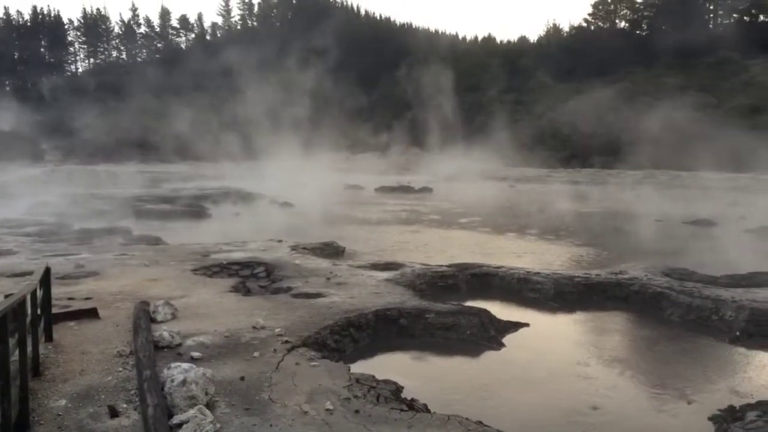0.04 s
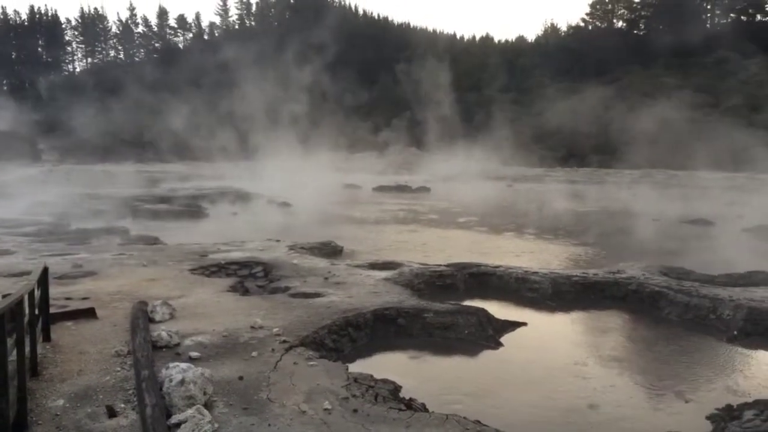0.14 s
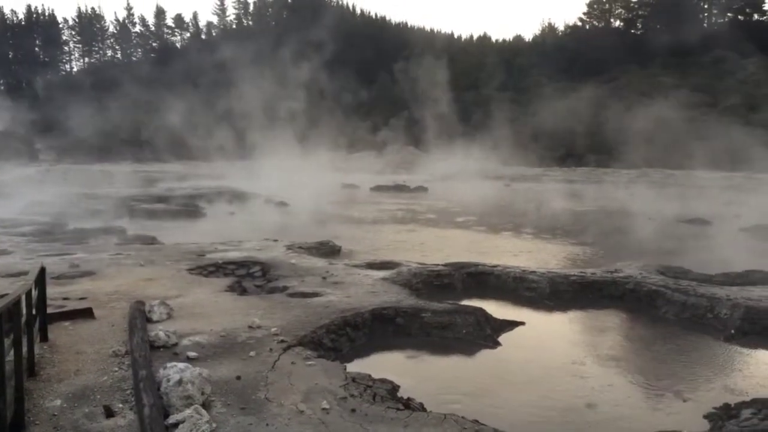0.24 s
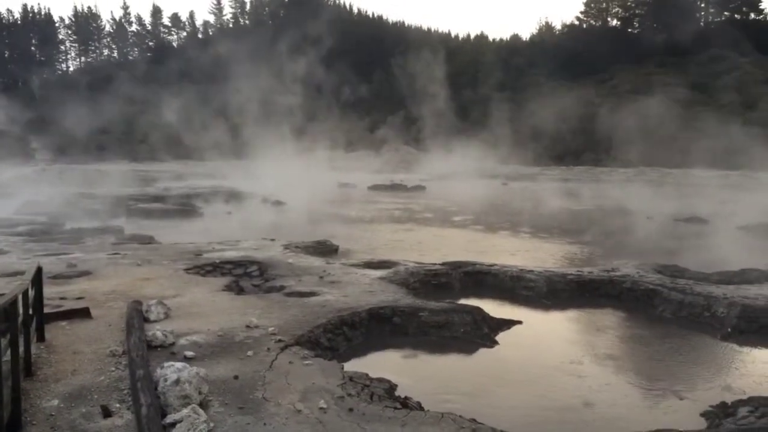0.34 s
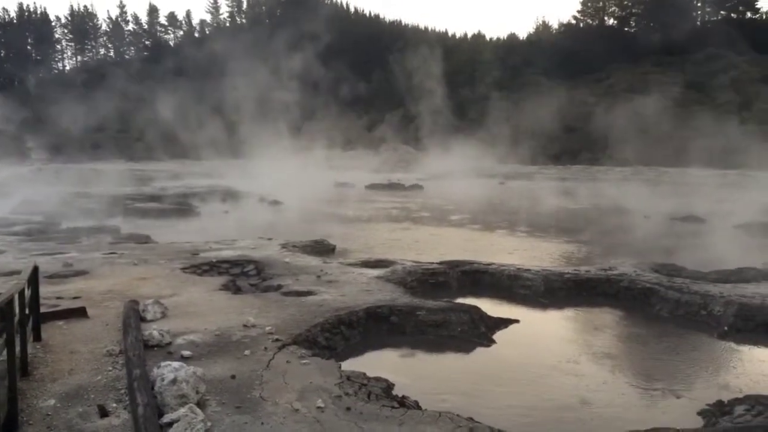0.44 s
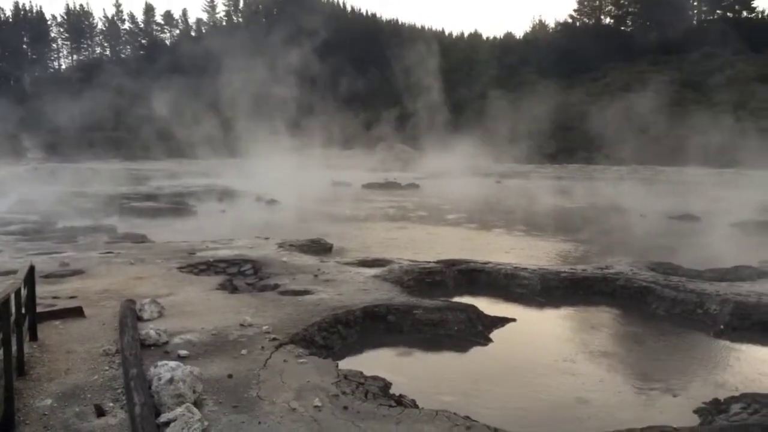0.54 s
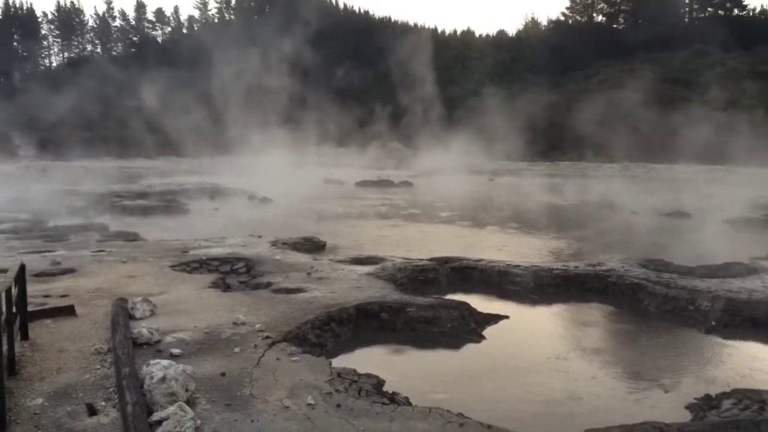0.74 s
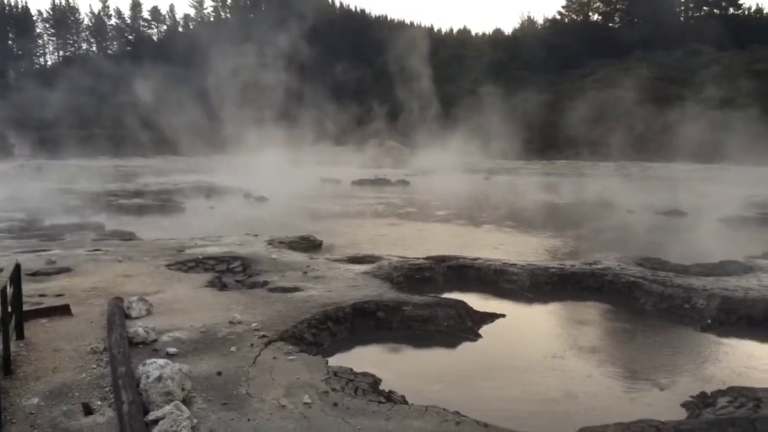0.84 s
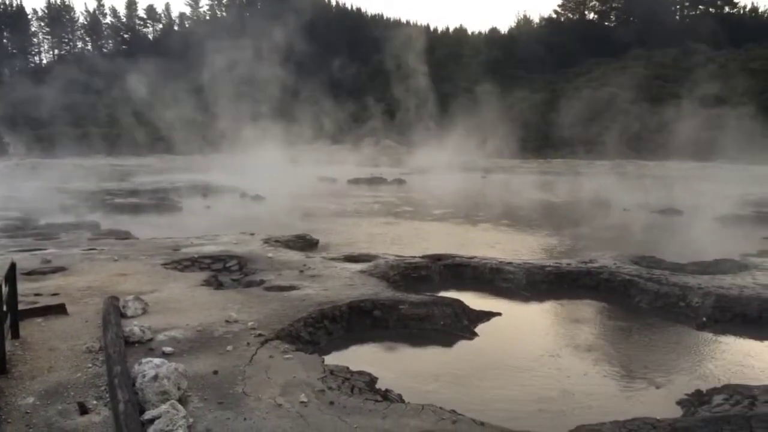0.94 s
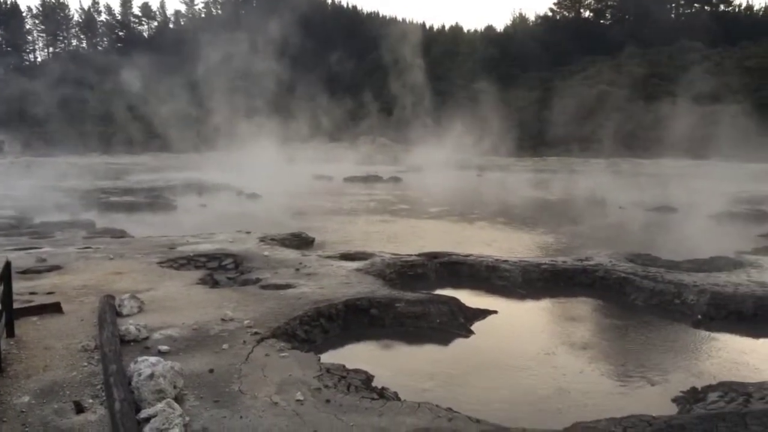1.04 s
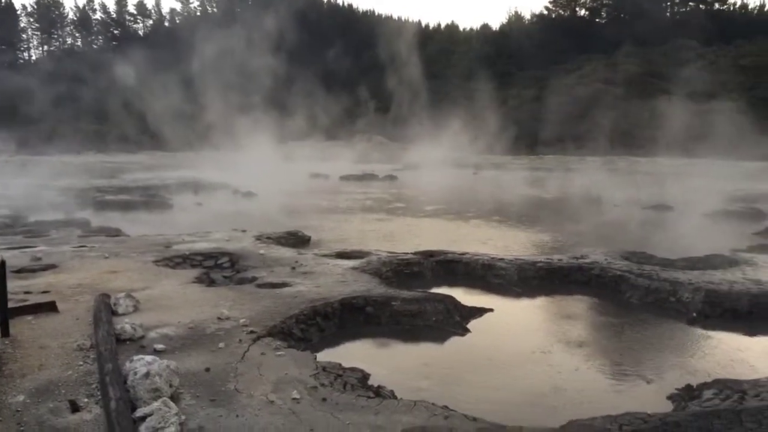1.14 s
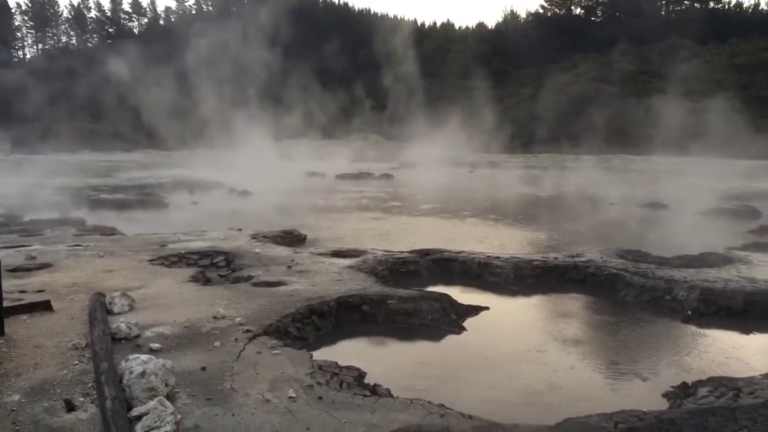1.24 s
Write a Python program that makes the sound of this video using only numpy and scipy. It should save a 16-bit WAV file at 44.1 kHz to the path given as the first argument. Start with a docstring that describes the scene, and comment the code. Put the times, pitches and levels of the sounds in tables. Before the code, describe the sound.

Thick mud bubbling with low plops over a faint, steady hiss of steam.

```python
"""Big gas bubbles heave through the thick mud of a hot outdoor pool, making low plops.
Each pocket of gas rings for just a few cycles before the mud stops it. Smaller bubbles
burst with a short rising blip, and flung droplets land with tiny ticks. Far bubbles and
wind murmur underneath, and steam hisses steadily over it all."""
import sys
import numpy as np
from scipy import signal
from scipy.fft import rfft, irfft
from scipy.io import wavfile
from scipy.ndimage import uniform_filter1d

SR = 44100
rng = np.random.default_rng(int(sys.argv[2]) if len(sys.argv) > 2 else 0)


def to_wav(s):
    """Save 16-bit WAV."""
    ch = np.atleast_2d(s).T  # columns
    pcm = np.round(np.clip(ch, -1, 1) * 32767)  # PCM
    wavfile.write(sys.argv[1], SR, pcm.astype(np.int16))


N = 57330  # samples: 1.3 seconds

# Tone of the steady background hiss, dropping sharply above about 2.5 kHz:
# (frequency [Hz], relative level [dB])
HISS_SPECTRUM = [(290, -10), (500, -3.5), (700, -1.5), (1000, 0), (1300, -4), (1550, -6.5), (1900, -6.5),
                 (2350, -2), (2530, -4.5), (2640, -18), (3000, -12), (3450, -15.5), (3850, -12.5),
                 (4700, -20), (6400, -18), (7300, -25.5), (8600, -29.5), (15000, -32.5)]
# Tone of the murmur, mostly bass: (frequency [Hz], relative level [dB])
MURMUR_SPECTRUM = [(20, -17), (40, -9), (65, 2.5), (100, -4), (150, -8.5), (220, -13.5), (350, -19.5),
                   (500, -26), (800, -53.5)]
# How loud the murmur is as time passes: (time [s], level [dB])
MURMUR_LEVELS = [(0, -49.5), (0.301, -50.5), (.55, -49.5), (.75, -54), (1.0, -52.5), (1.15, -57),
                 (1.3, -55.5)]
# Big bubbles: (start [s], pitch [Hz], level [dB], fade [cycles])
BIG_BUBBLES = [(0.0783, 71.5, -34.5, 0.43), (0.1352, 129, -45, 5.3), (0.1504, 71, -40.5, 3.5),
               (0.215, 84.8, -30, 2.26), (0.3061, 94.4, -31.5, 0.35), (0.3733, 103.7, -19, 0.64),
               (0.3916, 139, -25, 0.28), (0.422, 90.7, -32, 2.3), (0.4633, 75.6, -26.5, 1.04),
               (0.4966, 71.6, -37.5, 0.39), (0.5131, 66, -33.5, 1.14), (0.585, 67, -38.5, 1.8),
               (0.621, 127, -42, 0.57), (0.6332, 63, -31.5, 1.16), (0.6595, 68, -26, 0.81),
               (0.7439, 64, -40, 0.7), (0.7896, 108.5, -30.5, 0.76), (.826, 82, -43, 0.62),
               (0.85, 99, -38, 0.79), (0.8931, 126, -33, 0.14), (0.945, 70, -43, 0.57),
               (1.0158, 67.6, -40, .9), (1.0855, 105, -49, 4.1), (1.236, 100.5, -39.5, 2.2)]
# Small bubbles: (start [s], pitch [Hz], level [dB], hold [s], fade [s], pitch rise [octaves/s]) # The 757 Hz
# and 1280 Hz rows are not bubbles of their own: they add higher tones to the blips that start just before them.
SMALL_BUBBLES = [(0.313, 340, -49, .003, 0.0054, 6), (0.3685, 416, -43, 0.0026, 0.0062, 3),
                 (0.481, 241, -41.5, 0.0049, 0.0086, 11), (0.6609, 156, -28.5, 0.0016, 0.0091, 4.4),
                 (0.6616, 406, -29, 0.011, 0.002, 4.7), (.6635, 541, -43.5, 0.0037, 0.0037, 4),
                 (.6635, 757, -45.5, 0.007, 0.0041, 1.2), (0.6706, 301, -29, 0.0012, 0.0025, 5),
                 (0.6834, 232, -40.5, .001, 0.0061, 5.6), (0.9593, 295.4, -40.5, .020, 0.0063, 21.5),
                 (0.983, 753, -59, 0.0045, 0.0019, 18), (1.0071, 659, -37, 0.00056, 0.0047, 4),
                 (1.0075, 1280, -47.5, 0.0012, 0.0018, 2.7)]
# Flung droplets: (start [s], relative level [dB])
DROPLETS = [(0.512, -54), (1.027, -54), (1.031, -58), (1.085, -59), (1.088, -59), (1.138, -57)]
# Tone of the droplets' ticks, mostly treble: (frequency [Hz], relative level [dB])
DROPLET_SPECTRUM = [(2500, -28), (4500, -6), (5800, 11.5), (7500, -5), (11000, -4), (15000, -13)]


def gain(db):
    """Turn decibels into a number to multiply a sound by."""
    return 10 ** (np.asarray(db) / 20)


def noise(spectrum):
    """Random noise with the given tone, scaled to a typical size of 1."""
    hz, db = np.array(spectrum, float).T
    frequencies = np.maximum(np.arange(N // 2 + 1) * SR / N, 1)
    tone = gain(np.interp(np.log(frequencies), np.log(hz), db))
    shaped = irfft(rfft(rng.standard_normal(N)) * tone, N)
    return shaped / shaped.std()


def wander(rate_hz):
    """A smooth random drift up and down, with a typical size of about 1."""
    step_samples = int(SR / rate_hz)
    steps = rng.standard_normal(N // 100)[np.arange(N) // step_samples]
    smooth = uniform_filter1d(uniform_filter1d(steps, step_samples), step_samples)
    return smooth / smooth.std()


def steam():
    """A steady background hiss with a slight flutter."""
    level_db, flutter_db = -59, 0.15
    return noise(HISS_SPECTRUM) * gain(level_db + flutter_db * wander(rate_hz=13.7))


def murmur():
    """Far bubbles and wind make an uneven low rumble that eases as the pool calms."""
    level_db = np.interp(np.arange(N) / SR, *np.array(MURMUR_LEVELS).T)
    flutter_db = 2.27
    return noise(MURMUR_SPECTRUM) * gain(level_db + flutter_db * wander(rate_hz=22))


def bubble(start, hz, swell_s, hold_s, fade_s, octaves_per_s, overtone_db):
    """A pocket of gas rings: it swells, holds and dies away, rising in pitch as it opens."""
    age = np.clip(np.arange(N) / SR - start, 0, None)
    swell = np.sin(np.pi / 2 * np.minimum(age / swell_s, 1)) ** 2
    fade_age = np.maximum(age - swell_s - hold_s, 0)
    fade = np.exp(-(fade_age / fade_s) ** 1.41)  # power over 1: the mud closes in, cutting the ring short
    loudness = swell * fade
    pitch = hz * 2 ** np.minimum(octaves_per_s * age, 1)  # rises one octave at most
    phase = 2 * np.pi * np.cumsum((age > 0) * pitch) / SR
    # The widest swings add a quiet tone one octave higher.
    overtone = gain(overtone_db) * loudness ** 2 * np.cos(2 * phase)
    return loudness * np.sin(phase) + overtone


def plops():
    """Big bubbles ring low, and the thick mud stops them within a few cycles."""
    swell_cycles = 0.8
    return sum(gain(db) * bubble(start, hz, swell_cycles / hz, hold_s=0, fade_s=fade_cycles / hz,
                                 octaves_per_s=0.45, overtone_db=-20.5)
               for start, hz, db, fade_cycles in BIG_BUBBLES)


def blips():
    """Small bubbles burst at the surface with a quick upward chirp."""
    swell_cycles = 1.21
    return sum(gain(db) * bubble(start, hz, swell_cycles / hz, hold, fade, rise, overtone_db=-26.5)
               for start, hz, db, hold, fade, rise in SMALL_BUBBLES)


def spatters():
    """Flung droplets make faint, bright ticks: noise that starts sharply and dies fast."""
    time = np.arange(N) / SR
    fade_s = 0.002
    loudness = sum(gain(db) * (time >= start) * np.exp(-np.abs(time - start) / fade_s)
                   for start, db in DROPLETS)
    return loudness * noise(DROPLET_SPECTRUM) / 2


def scene():
    """All the sounds of the open-air pool, added into one channel."""
    return (plops() + blips() + spatters() + steam() + murmur())[None]


def record(dry):
    """Filters remove any constant offset, rumble too low to hear, and the highest treble."""
    low_cut_hz, high_cut_hz = 11, 15300
    low_cut = signal.butter(1, low_cut_hz, "high", fs=SR, output="sos")
    high_cut = signal.ellip(10, .2, 70, high_cut_hz, fs=SR, output="sos")
    return signal.sosfilt(high_cut, signal.sosfilt(low_cut, dry))


dry = scene()
out = record(dry)
to_wav(out)
```